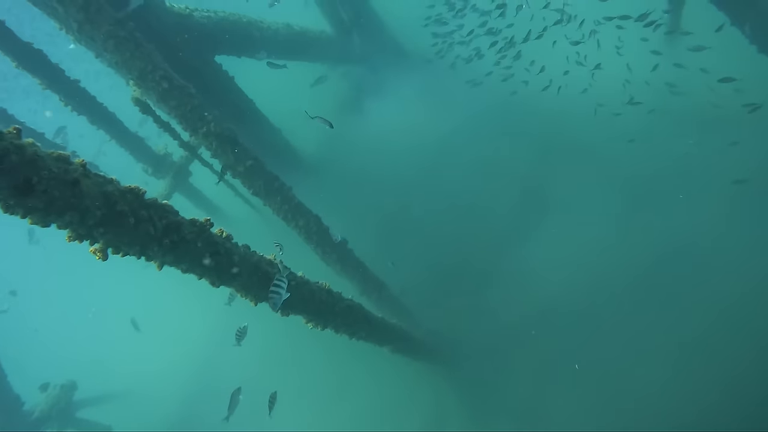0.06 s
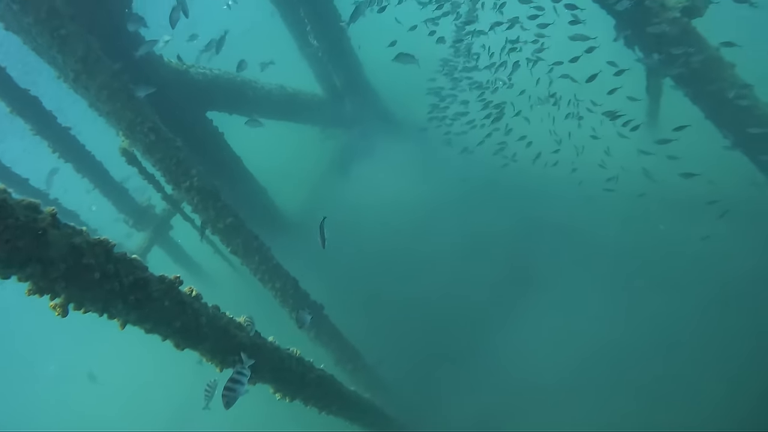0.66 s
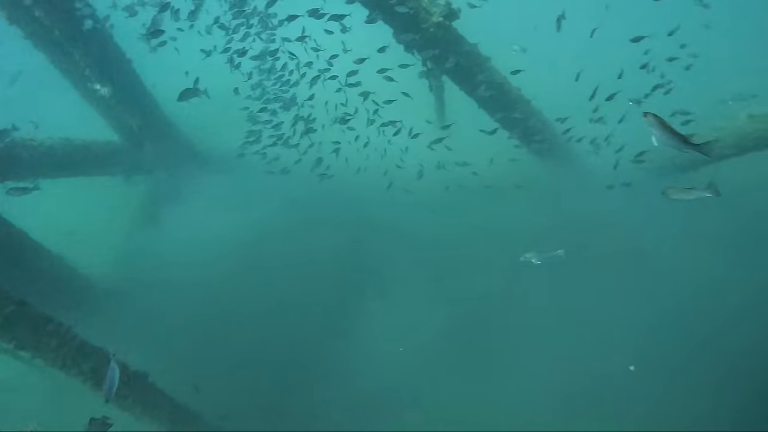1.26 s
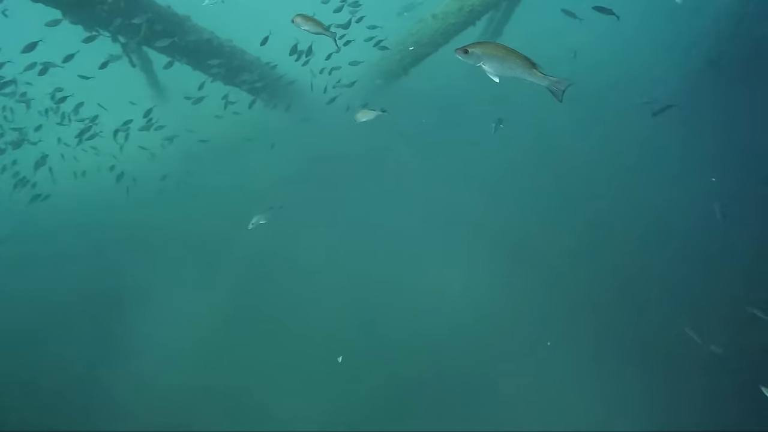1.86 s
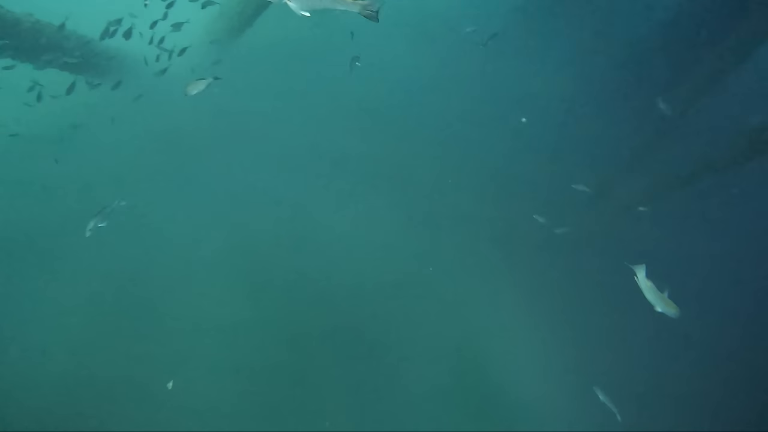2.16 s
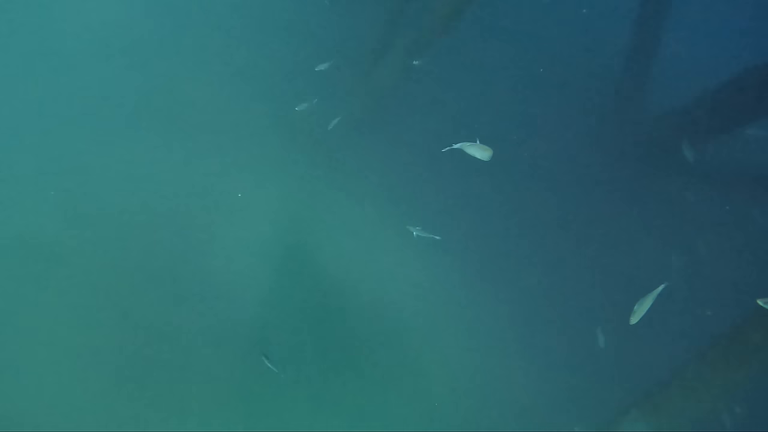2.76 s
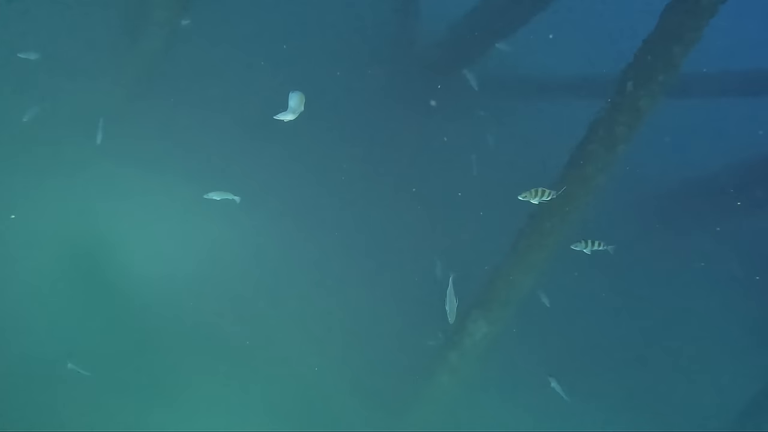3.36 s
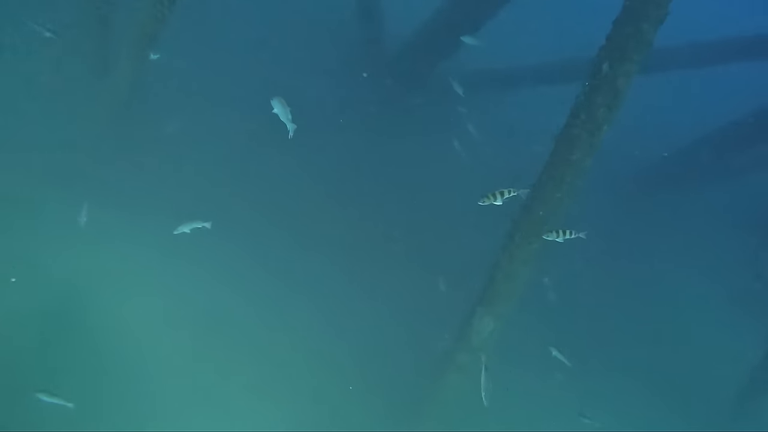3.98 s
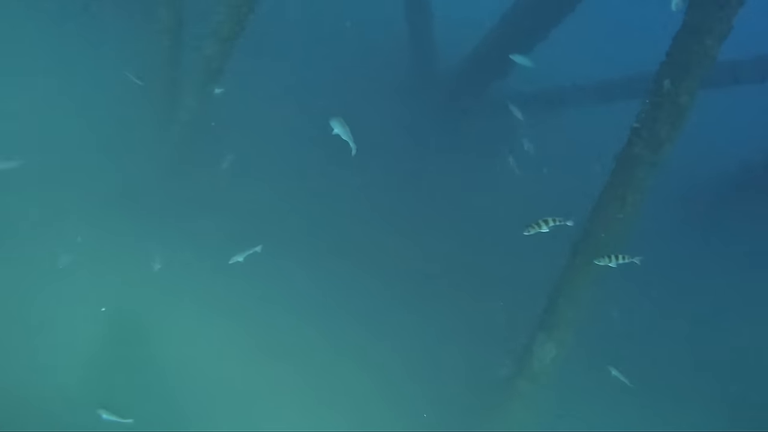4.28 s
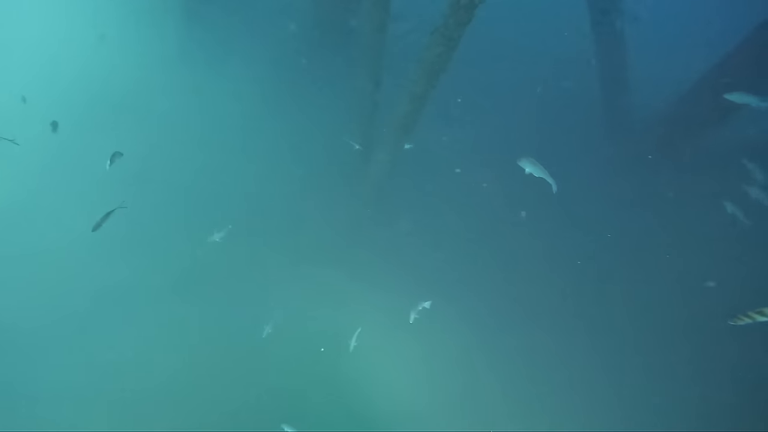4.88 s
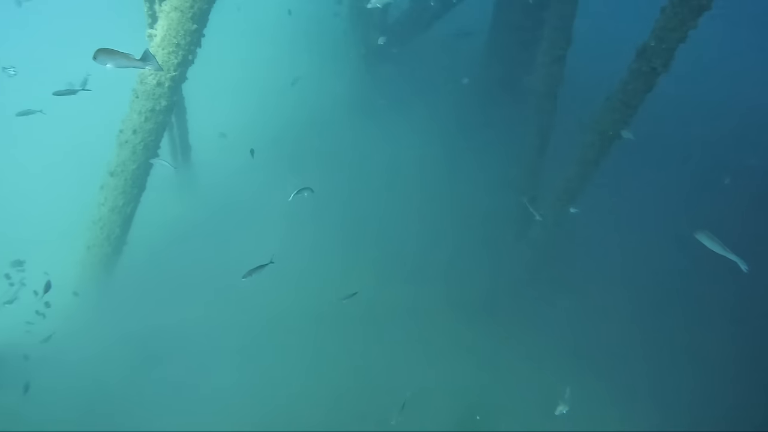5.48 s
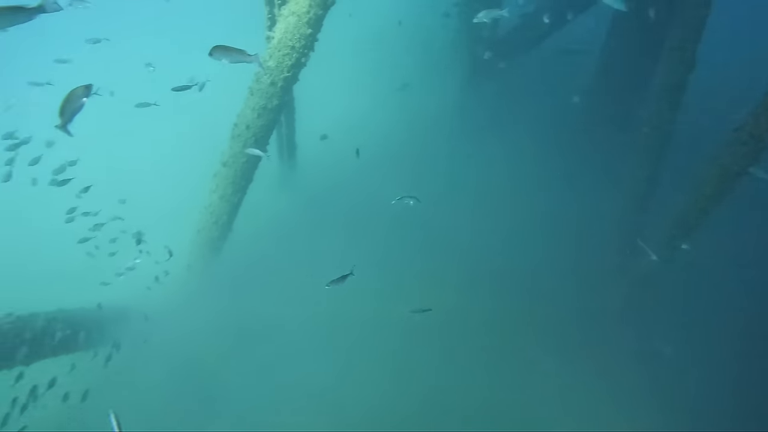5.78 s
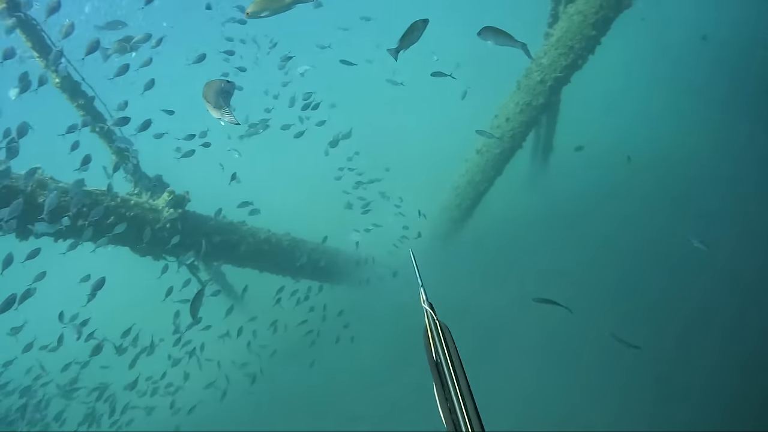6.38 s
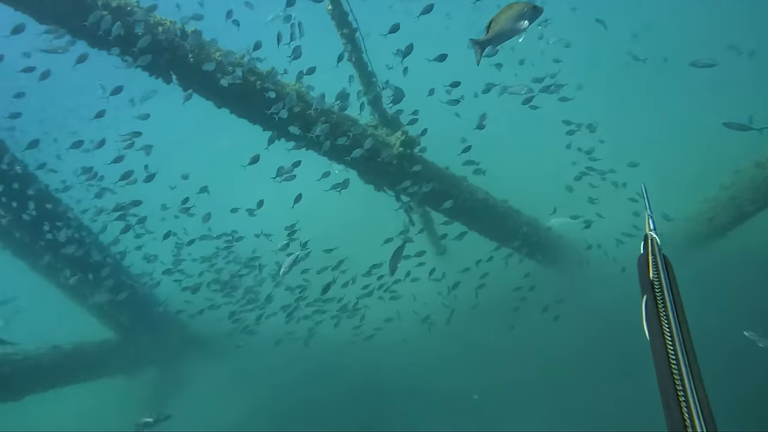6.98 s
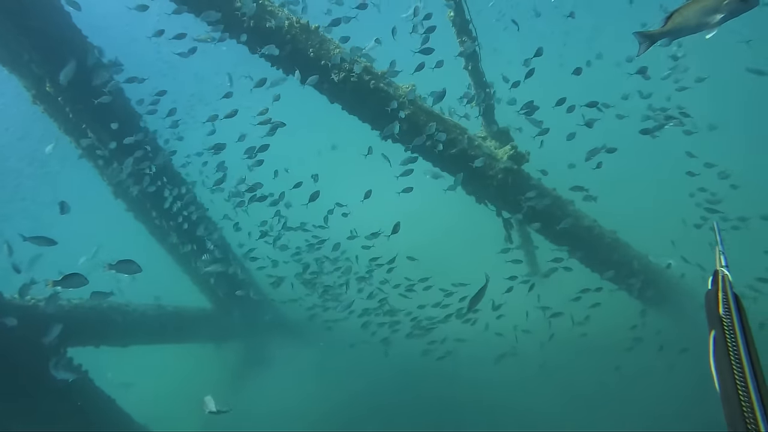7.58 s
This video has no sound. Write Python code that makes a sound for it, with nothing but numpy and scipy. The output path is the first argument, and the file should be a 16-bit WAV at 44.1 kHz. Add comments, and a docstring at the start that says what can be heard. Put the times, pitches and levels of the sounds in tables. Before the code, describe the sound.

Underwater, a dull knock on the camera case opens a steady scatter of sharp shrimp snaps, some close and some distant, with short echoes off steel legs. Water rumbles softly around the case, with a few small bumps and faint swishes. About two thirds through, the crackle dips and the sound closes from stereo to a duller, nearly mono one, where the clicks pick up again.

```python
"""Snapping shrimp crackle on the legs of a sunken steel frame, heard from inside a diver's camera case.
Each snap is a collapsing bubble whose sound bounces off the steel and makes the case ring.
Water rumbles round the case, bumps it and now and then swishes past.
After five seconds the sound narrows from two ports (left and right sound openings)
to mostly one duller middle channel, and the background crackle thins."""
import sys
import numpy as np
from scipy import signal
from scipy.fft import rfft, irfft
from scipy.io import wavfile
from scipy.ndimage import uniform_filter1d

SR = 44100
rng = np.random.default_rng(int(sys.argv[2]) if len(sys.argv) > 2 else 0)


def log_audio(samples):
    """Write samples as a 16-bit WAV file to the path given in sys.argv[1]."""
    # one column per channel
    frames = np.atleast_2d(samples).T
    # limit to full scale, then quantise
    limited = np.clip(frames, -1, 1)
    pcm = np.round(limited * 32767).astype(np.int16)
    wavfile.write(sys.argv[1], SR, pcm)


N = 341331
TIME_S, FREQS_HZ = np.arange(N) / SR, np.fft.rfftfreq(2 * N, 1 / SR)


def gain(db):
    """Turns decibels into a number to multiply by."""
    return 10 ** (np.asarray(db) / 20)


def unit_level(x):
    """Scales a signal to an average (rms) level of 1."""
    return x / np.sqrt(np.mean(x ** 2) + 1e-20)


def over_frequency(table):
    """Joins a table's rows into one curve per column, across all frequencies."""
    hz, *columns = np.transpose(table)
    return [np.interp(np.log(FREQS_HZ + 1), np.log(hz + 1), column) for column in columns]


def over_time(table):
    """Joins rows of (time_s, value) into a curve as long as the scene."""
    return np.interp(TIME_S, *np.transpose(table))


def add(mix, start_s, sound):
    """Mixes a sound in at start_s."""
    part = mix[..., max(round(start_s * SR), 0):][..., :sound.shape[-1]]
    part += sound[..., :part.shape[-1]]


def filtered(x, response):
    """Multiplies each frequency in a sound by its response."""
    return irfft(rfft(x, 2 * N) * response)[..., :N]


def stereo_noise(size, likeness):
    """White noise for left and right: likeness 0 is unrelated, 1 is identical."""
    left, other = rng.standard_normal((2, size))
    return np.array([left, likeness * left + np.sqrt(1 - likeness ** 2) * other])


def wander(size, smooth_samples):
    """A random curve that drifts around zero, typically by about 1."""
    return unit_level(uniform_filter1d(rng.standard_normal(size), smooth_samples))


def bubble_snap(pitch_hz, tail_db, rise_s, fall_s, echo_s, sharpness=0.52, size=5000):
    """One bubble collapses: a short crack, then a tail of echoes off the steel and the surface."""
    t, hz = np.arange(size) / SR, np.fft.rfftfreq(size, 1 / SR) + 1
    band = 1 / (1 + 1j * sharpness * (hz / pitch_hz - pitch_hz / hz)) ** 2  # broad, around pitch_hz
    delay_s = 1.1e-5 * rng.standard_normal()  # snaps come from all sides, so one port hears them first
    band = band * np.exp(1j * np.pi * hz * delay_s * np.array([[1], [-1]]))
    crack = stereo_noise(size, likeness=0.92) * (1 - np.exp(-t / rise_s)) ** 2 * np.exp(-t / fall_s)
    tail = stereo_noise(size, likeness=0.78) * (1 - np.exp(-t / fall_s)) * np.exp(-t / echo_s)
    tail *= gain(4.2 * wander(size, 130))  # echoes come in clumps
    crack, tail = (unit_level(irfft(rfft(part) * band, size)) for part in (crack, tail))
    return (crack + gain(tail_db) * tail) / np.sqrt(size)


def far_shrimp(snaps_per_s=250, spread_db=9, crackle_db=-6, hiss_db=-11.5, bands=32):
    """Many small snaps, low and high, blurred by distance; the farthest merge into hiss."""
    crackle = np.zeros((2, N))
    for pitch_hz in np.geomspace(1800, 10500, bands):
        strength = gain(spread_db * np.minimum(rng.exponential(1, N), 2.3))
        clicks = strength * (rng.random(N) < snaps_per_s / bands / SR)
        blur = rng.uniform(1.0, 2.27)
        snap = bubble_snap(pitch_hz, tail_db=-5, rise_s=0.00081 * blur, fall_s=0.0012 * blur, echo_s=0.026)
        crackle += signal.oaconvolve(clicks[None], snap, axes=1)[:, :N]  # a snap at every click
    hiss = unit_level(stereo_noise(N, likeness=0.7))
    level_db = -46.5 + 0.8 * wander(N, 12000)  # slow chance swells
    return gain(level_db) * (gain(crackle_db) * unit_level(crackle) + gain(hiss_db) * hiss)


# The notes at which the case rings: pitch_hz, boost_db
CASE_NOTES = [(1090, 6), (1510, 5), (1720, 8), (2296, 7.5), (2680, 9), (2957, 6.5), (3463, 6.5),
              (3928, 6.5), (4600, 2.5), (5200, 4.5), (6500, 2.5)]


def case_ring(tone_table, pitch_over_width=16.84):
    """The case as a filter: a broad tone curve plus a narrow peak for each ringing note."""
    ring_db = sum(boost_db / (1 + (2 * pitch_over_width * (FREQS_HZ / pitch_hz - 1)) ** 2)
                  for pitch_hz, boost_db in CASE_NOTES)
    log_gain = np.log(gain(over_frequency(tone_table)[0] + ring_db))
    mirrored = np.concatenate([log_gain, log_gain[-2:0:-1]])
    # minimum phase: the ringing comes after a click, never before it
    return np.exp(np.conj(signal.hilbert(mirrored)))[:len(log_gain)]


# How the case passes sound to the two ports: frequency_hz, gain_db
PORT_TONE = [(300, -40), (650, -10), (900, -4), (1230, -6.5), (1450, 1), (2050, -5.5), (3000, -5.5),
             (4200, -1.5), (5800, -5), (7800, -1), (8500, -17.5), (11600, -11), (13000, -18), (15300, -49)]
# How the two ports differ: frequency_hz, left_minus_right_db, left_lead_radians
PORT_BALANCE = [(700, 1, -0.6), (1100, 0, -1.5), (1300, -3.5, 0.0), (1750, 3, -0.3), (2050, 3, -2.0),
                (2900, 7, -1.0), (3400, 6, -0.4), (3850, 8, 0.3), (4300, -6, -0.8), (4700, 0, -0.5),
                (5300, -3, -0.2), (7500, -1.5, 0.0), (9000, 2.5, 0.2)]


def through_ports(sound):
    """Sound rings the case and reaches each port with its own strength and timing."""
    balance_db, lead = over_frequency(PORT_BALANCE)
    left = gain(balance_db / 2) * np.exp(0.5j * lead)
    sides = np.array([left, 1 / left])
    sides /= np.sqrt(np.mean(abs(sides) ** 2, axis=0))  # keeps the total power unchanged
    return filtered(sound, sides * case_ring(PORT_TONE))


# How strongly water flows round the case: time_s, level_db
FLOW_STRENGTH = [(0, -41), (2, -40.5), (3.3, -38), (4.8, -37.5), (5.35, -52), (6.8, -47.5), (7.4, -42)]
# The tone of the deep rumble: frequency_hz, level_db
RUMBLE_TONE = [(8, -11.5), (20, 1.5), (35, -9), (100, -29.5), (200, -57), (600, -86)]
# The tone of the higher slosh: frequency_hz, level_db
SLOSH_TONE = [(50, -10.5), (140, 0.5), (300, -7), (480, -5), (640, -29), (1800, -35)]


def water_flow(full_slosh_db=-65.5, slosh_growth=0.42, churn_db=3):
    """Swirls press on the case: a deep rumble, and a churning slosh that grows less with the flow."""
    rumble = filtered(stereo_noise(N, likeness=0.98), gain(over_frequency(RUMBLE_TONE)[0]))
    slosh = filtered(stereo_noise(N, likeness=0.82), gain(over_frequency(SLOSH_TONE)[0]))
    flow_db = over_time(FLOW_STRENGTH)
    slosh_db = full_slosh_db + slosh_growth * (flow_db - flow_db.max()) + churn_db * wander(N, 1500)
    return gain(flow_db) * unit_level(rumble) + gain(slosh_db) * unit_level(slosh)


# Bumps and gurgles on the case: start_s, level_db, pitch_hz, swell_s, muffled_above_hz
BUMPS = [(0.053, -14, 260.4, 0.0022, 368), (0.0526, -39, 524, 0.0042, 579),
         (0.055, -21.5, 60.6, 0.0072, 306), (0.223, -48.5, 197, 0.0028, 400),
         (0.6662, -36, 146, 0.0017, 740), (1.379, -31, 192, 0.0036, 380), (1.39, -32.5, 242, 0.007, 420),
         (1.412, -45, 150, 0.006, 350), (3.526, -35, 334, 0.00054, 586), (4.442, -37.5, 426, 0.0022, 584),
         (4.5, -43, 448, 0.0035, 560), (4.543, -39, 440, 0.0017, 593), (4.599, -43.5, 380, 0.0021, 590),
         (4.617, -54, 500, 0.0084, 590), (4.671, -42, 463, 0.0021, 566), (7.5959, -35, 140, 0.00071, 650),
         (7.6, -38, 69.6, 0.0045, 398)]


def case_bumps(roughness=0.27, scrape_hz=450, size=4000):
    """Soft, slightly rough bumps: the water stills the case within a few shakes and dulls the sound."""
    out, t, hz = np.zeros((2, N)), np.arange(size) / SR, np.fft.rfftfreq(size, 1 / SR)
    padding_s = t[size // 2]
    age_s = np.maximum(t - padding_s, 0)
    for start_s, level_db, pitch_hz, swell_s, muffled_above_hz in BUMPS:
        envelope = (age_s / swell_s * np.exp(1 - age_s / swell_s)) ** 2
        bump = envelope * np.cos(2 * np.pi * pitch_hz * (age_s - swell_s))
        noise = stereo_noise(size, likeness=0.28)
        scrape = unit_level(irfft(rfft(noise) / (1 + (hz / scrape_hz) ** 10), size))
        rough_bump = bump * (1 + roughness * scrape)
        muffled = irfft(rfft(rough_bump) / (1 + (hz / muffled_above_hz) ** 20), size)
        add(out, start_s - padding_s, gain(level_db) * muffled)
    return out


# The main snaps of nearby shrimp: start_s, level_db, pitch_hz
MAIN_SNAPS = [(0.072, -15.5, 4140), (0.131, -20.5, 2490), (0.2288, -15.5, 3830), (0.262, -21, 3760),
              (0.312, -16.5, 3400), (0.327, -18.5, 3500), (0.341, -18, 4840), (0.589, -10, 4950),
              (0.83, -15, 1920), (0.845, -9, 5900), (0.904, -10, 3700), (0.9285, -12.5, 3240),
              (0.9576, -13, 4400), (1.0033, -10, 4530), (1.0817, -14, 3480), (1.105, -13.5, 3900),
              (1.125, -19, 2480), (1.3845, -17, 4070), (1.4846, -19, 2780), (1.525, -9.5, 4040),
              (1.6465, -16.5, 3300), (1.7388, -19.5, 4600), (1.778, -13.5, 4330), (1.871, -17, 5960),
              (1.987, -21.5, 2040), (2.016, -8.5, 4140), (2.0587, -17.5, 7400), (2.2046, -14, 2660),
              (2.216, -14, 5670), (2.2833, -14, 4600), (2.3872, -16, 6030), (2.4637, -13, 2350),
              (2.4735, -14.5, 3500), (2.7563, -24.5, 2100), (2.79, -17, 2260), (2.884, -9, 3900),
              (3.0351, -9, 7400), (3.0444, -9.5, 4580), (3.1148, -15, 4750), (3.1345, -10.5, 3600),
              (3.235, -19.5, 3900), (3.285, -17.5, 2740), (3.3128, -14, 3940), (3.33, -22.5, 2760),
              (3.414, -19.5, 3890), (3.4737, -15, 4600), (3.593, -19.5, 4030), (3.8425, -16, 5360),
              (4.201, -14.5, 2750), (4.2622, -19.5, 2720), (4.341, -23, 2675), (4.369, -17, 2970),
              (4.4247, -14, 3060), (4.4855, -19, 2500), (4.542, -19, 4060), (4.64, -20, 2560),
              (4.8047, -12, 3650), (4.8715, -14.5, 3360), (4.9042, -22.5, 3120), (5.0952, -29, 3350),
              (5.3135, -24.5, 3800), (5.339, -31.5, 2330), (5.495, -28, 2700), (5.535, -24.5, 2160),
              (5.615, -23.5, 3000), (5.7525, -17, 3550), (5.839, -24.5, 4200), (5.874, -19, 3420),
              (5.932, -25, 2820), (5.9792, -16, 5807), (6.109, -16.5, 6320), (6.2084, -31, 3000),
              (6.2912, -13.5, 3060), (6.3165, -16, 4570), (6.357, -25, 2429), (6.436, -25.5, 2640),
              (6.4675, -29, 2500), (6.5003, -17, 2500), (6.5512, -14, 5000), (6.5717, -9, 3830),
              (6.6983, -15, 6502), (6.75, -22, 2350), (6.7668, -11, 3800), (6.827, -22, 3500),
              (6.8848, -22, 3920), (6.909, -13, 3732), (6.9765, -16, 6700), (7.0617, -11.5, 2480),
              (7.105, -18, 5160), (7.2025, -13, 2300), (7.269, -23.5, 2900), (7.289, -15.5, 2430),
              (7.3343, -10.5, 4570), (7.35, -19, 2750), (7.403, -26.5, 3370), (7.4384, -26, 3600),
              (7.4822, -11.5, 3050), (7.585, -12.5, 4540), (7.624, -19.5, 4040), (7.6458, -11.5, 6660),
              (7.727, -17, 2680)]


def near_shrimp(snaps, tail_db=-11.5, rise_s=0.00018, fall_s=0.0017, echo_s=0.019, edge_hz=15000):
    """Single snaps: close ones crack with a bright edge; weaker ones are farther off and echo more."""
    out = np.zeros((2, N))
    for start_s, level_db, pitch_hz in snaps:
        distance_db = np.clip(-10 - level_db, 0, 12)  # -10 dB or louder counts as closest
        blur = gain(0.29 * distance_db)
        snap = bubble_snap(pitch_hz, tail_db + 1.153 * distance_db,
                           rise_s * blur ** 2, fall_s * blur, echo_s, sharpness=0.63)
        edge = bubble_snap(edge_hz, tail_db, rise_s / 2, fall_s / 2, echo_s, size=1000)
        add(out, start_s, gain(level_db) * snap)
        add(out, start_s, gain(level_db - 9.5 - 0.7 * distance_db) * edge)
    return out


def stray_shrimp(count=70, level_db=-23, spread_db=5.5, pitch_hz=3470):
    """Weaker snaps scattered through the scene, each with a random level and pitch."""
    shift, loudness, octaves = rng.uniform(-0.91, 1, (count, 3)).T
    start_s = (np.arange(count) + 0.5 + shift / 2) / count * N / SR
    return near_shrimp(zip(start_s, level_db + spread_db * loudness, pitch_hz * 2 ** octaves))


def tiny_shrimp(count=60, quietest_db=-28, range_db=12):
    """Tiny shrimp close by: thin, dry ticks with hardly any echo."""
    out = np.zeros((2, N))
    for when, loudness in rng.random((count, 2)):
        tick = bubble_snap(pitch_hz=11000, tail_db=-9, rise_s=0.0001, fall_s=0.00031, echo_s=0.011,
                           sharpness=0.63, size=1500)
        add(out, when * N / SR, gain(quietest_db + range_db * loudness) * tick)
    return out


# Rushes of water along the case: start_s, level_db, fade_s
WATER_SURGES = [(2.359, -58.5, 0.12), (6.935, -59, 0.044), (7.118, -52, 0.22)]


def water_surges(start_hz=400.3, end_hz=141, sink_s=0.05, rise_s=0.029, width_hz=300, top_hz=580,
                 fizz_db=-14, fizz_hz=1050, fizz_width_hz=900):
    """Swishes whose pitch sinks as the swirls grow and slow down, with a soft fizz above."""
    out = np.zeros(N)
    pitch_hz = end_hz + (start_hz - end_hz) * np.exp(-TIME_S / sink_s)
    sinking_tone = np.cos(2 * np.pi * np.cumsum(pitch_hz) / SR)
    for start_s, level_db, fade_s in WATER_SURGES:
        swirls = filtered(rng.standard_normal(N), np.exp(-(FREQS_HZ / width_hz) ** 2))
        swish = filtered(swirls * sinking_tone, 1 / (1 + (FREQS_HZ / top_hz) ** 20))
        fizz = filtered(rng.standard_normal(N), np.exp(-((FREQS_HZ - fizz_hz) / fizz_width_hz) ** 2))
        envelope = np.minimum(TIME_S / rise_s, 1) * np.exp(-np.maximum(TIME_S - rise_s, 0) / fade_s)
        surge = unit_level(swish) + gain(fizz_db) * unit_level(fizz)
        add(out, start_s, gain(level_db) * envelope * surge)
    return out


# How the case passes sound to the duller middle channel: frequency_hz, gain_db
MIDDLE_TONE = [(300, -65), (650, -14.5), (900, -9), (1250, -17.5), (1700, -9), (2600, -9.5), (3900, -9),
               (4600, -17.5), (7200, -19.5), (8800, -22.5), (9700, -24.5), (10900, -32), (12400, -18),
               (15300, -40)]
# How much of the sound is the middle channel: time_s, share_0_to_1
MIDDLE_SHARE = [(5.02, 0), (5.35, 0.6), (5.6, 0.91)]


def narrow_to_middle(ports, shrimp, water):
    """The two ports mostly give way to one duller channel, the same in both ears."""
    middle = filtered(shrimp[0], case_ring(MIDDLE_TONE)) + water[0]
    share = over_time(MIDDLE_SHARE)
    return (1 - share) * ports + share * middle


# The dip in the background crackle: time_s, gain_db
CRACKLE_DIP = [(5.05, -2), (5.35, -9.5), (5.42, -10.5), (5.85, -5.5)]


def dip(crackle):
    """The crackle drops as the sound narrows, then comes part of the way back."""
    return gain(over_time(CRACKLE_DIP)) * crackle


def scene():
    """Snaps ring through the case, the water joins them, and the whole sound narrows."""
    shrimp = near_shrimp(MAIN_SNAPS) + dip(stray_shrimp() + far_shrimp() + tiny_shrimp())
    flow = water_flow() * gain([[-1], [1]])  # a little louder on the right
    water = flow + case_bumps() + water_surges()
    ports = through_ports(shrimp) + water
    return narrow_to_middle(ports, shrimp, water)


def record(dry):
    """Cuts away the very highest treble, above 15800 Hz."""
    low_pass = signal.firwin(511, 15800, window=("kaiser", 9), fs=SR)
    return signal.oaconvolve(dry, low_pass[None], "same")


dry = scene()
out = record(dry)
log_audio(out)
```